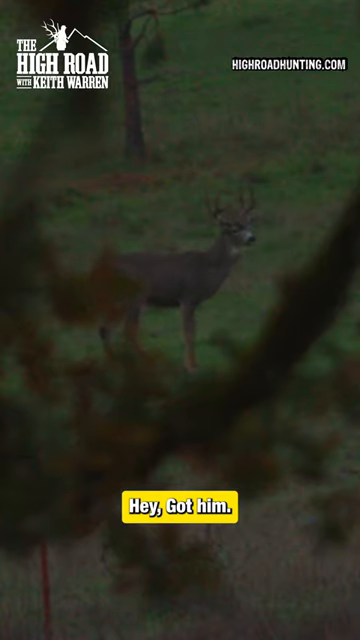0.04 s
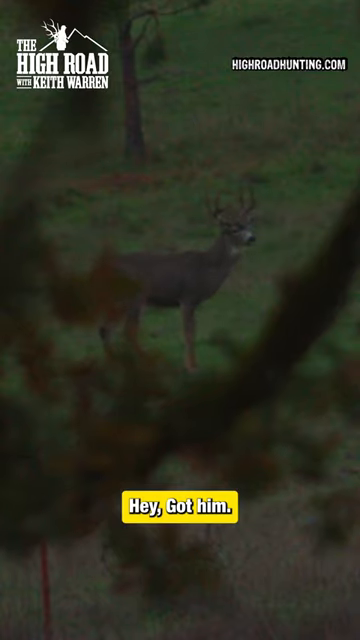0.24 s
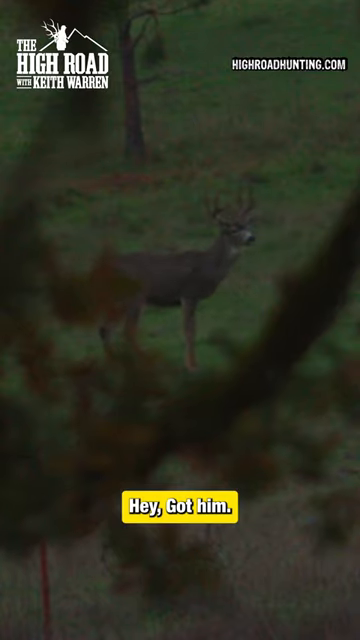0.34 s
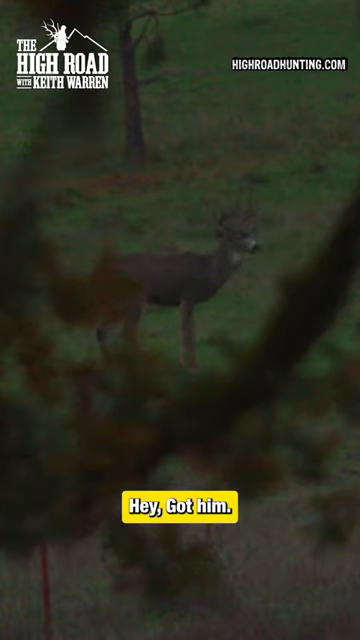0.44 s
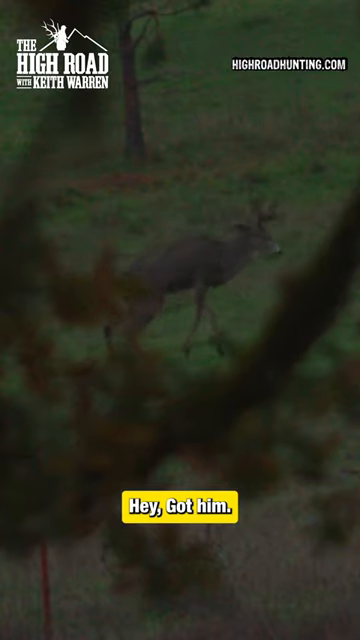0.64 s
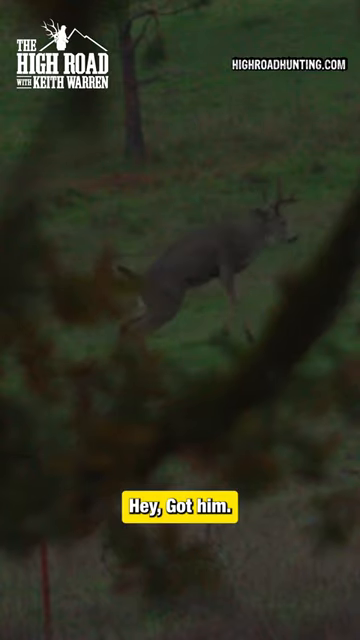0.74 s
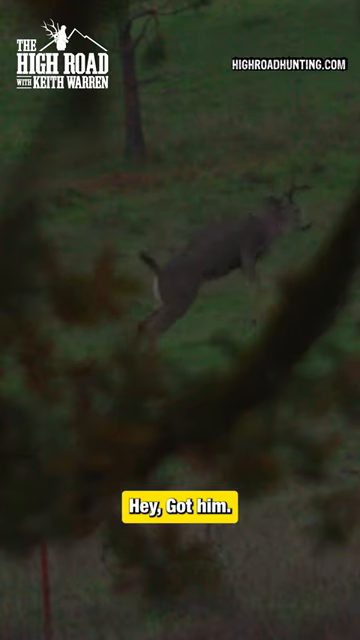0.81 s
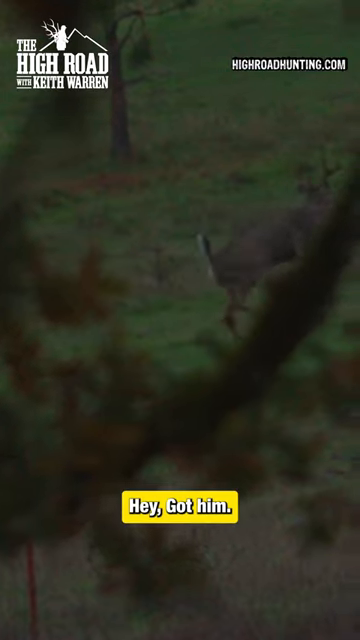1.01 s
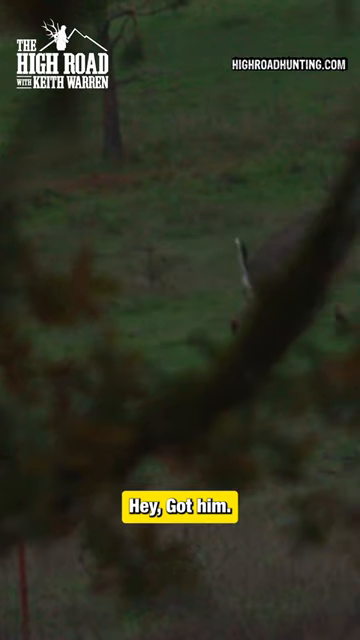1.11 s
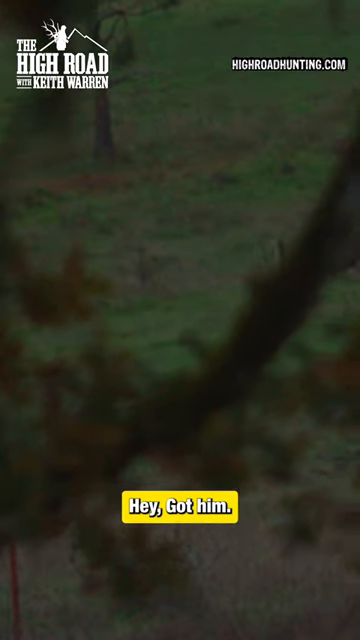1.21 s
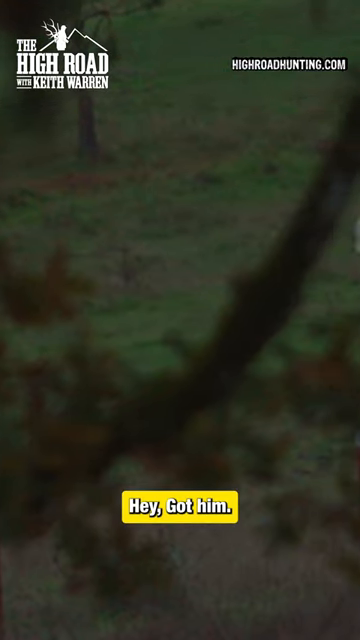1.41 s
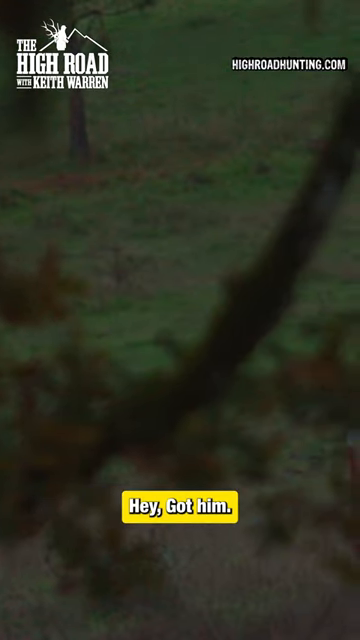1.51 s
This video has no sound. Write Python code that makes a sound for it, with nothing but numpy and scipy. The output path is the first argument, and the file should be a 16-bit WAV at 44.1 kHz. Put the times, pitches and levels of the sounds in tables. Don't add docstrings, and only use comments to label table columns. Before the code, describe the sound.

A muffled rifle fires once in open woodland, action clacking, crack echoing off the trees

```python
import sys
import numpy as np
from scipy import signal
from scipy.io import wavfile
from scipy.ndimage import uniform_filter1d, map_coordinates

SR = 44100
rng = np.random.default_rng(int(sys.argv[2]) if len(sys.argv) > 2 else 0)


def nominal_scale(level):
    x = np.asarray(level, float) / 20
    return 10 ** x


def waveform_to_disk(signal):
    frames = np.transpose(np.atleast_2d(signal))
    scaled = np.clip(frames, -1, 1) * 32767
    samples = np.round(scaled).astype(np.int16)
    wavfile.write(sys.argv[1], SR, samples)


N = 68355

# frequency [Hz], density [dB per Hz].
FIELD_SPECTRUM = [(25, -8), (60, 1), (227, -1.5), (520, 0.5), (1350, -11.5), (3310, -13), (8000, -35),
                  (16000, -45)]
# time [s], level [dB].
CLOTH_LEVEL = [(.5, -72), (.7, -51), (.85, -54.5), (.95, -59), (1.05, -56.5), (1.15, -50), (1.25, -54.5),
               (1.36, -53.5), (1.41, -49.5), (1.47, -54), (1.55, -56.5)]
# frequency [Hz], density [dB per Hz].
CLOTH_SPECTRUM = [(1500, -12), (4500, 5.5), (9000, -3), (13000, -17), (16000, -17.5)]
# highest pitch [Hz], level [dB].
SLING_TONES = [(14480, -74), (13800, -74), (11000, -75), (10250, -75), (9550, -69)]
# start [s], level [dB], frequency [Hz].
RUSTLES = [(.004, -51, 4500), (.025, -50, 4180), (.046, -57, 5500), (.054, -62, 7000), (0.061, -62, 7000),
           (0.075, -46, 3500), (.094, -62, 5000), (.124, -50, 4450), (.136, -56, 6500), (.14, -58, 5000),
           (0.154, -47, 3000), (0.169, -54, 3200), (0.178, -52, 3800), (.203, -58, 6500),
           (.21, -43.5, 4160), (.7553, -59, 10500), (.767, -60, 11000), (.9505, -37, 3000),
           (.984, -58, 7000), (1.0616, -66, 7000), (1.183, -60, 12000)]
BULLET_STRIKE = [
    (.79375, 4.5, 1750, .0035),
    (.8033, -5, 1350, .006),
]
# start [s], level [dB], frequency [Hz], T60 [s].
STRUCK_BODY = [
    (.7945, -2.5, 135, .04),
]
# start [s], level [dB], frequency [Hz], T60 [s], rise [cycles].
DULL_BLOWS = [(.483, -16, 257, 0.03, 0.4), (.496, -21.5, 252, 0.098, 0.28), (.498, -19.5, 897, 0.046, 0.32),
              (.503, -20, 119, 0.056, 0.08), (.512, -9, 630, 0.0074, 0.27), (.637, -22.5, 197, 0.022, 0.17),
              (.663, -24, 202, 0.053, 0.24), (.673, -23, 119, 0.047, 0.29), (.694, -20.5, 130, 0.018, 0.28),
              (0.389, -24, 70.5, 0.056, 0.36), (0.606, -35, 318, 0.077, 1.1),
              (.926, -28.5, 155, 0.046, 0.34), (.93, -26, 400, 0.023, 0.34), (.945, -38, 59.6, 0.15, 0.26),
              (.952, -21.5, 1090, 0.014, 1.2), (1.008, -23, 914, 0.02, 1.4),
              (1.08, -26.5, 464, 0.028, 0.59), (1.179, -16.5, 735, 0.038, 6.3),
              (.585, -22.5, 756, 0.034, 0.92), (.735, -28, 633, 0.036, 0.87), (.735, -33, 70, 0.063, .4),
              (1.235, -42, 111, 0.083, 0.42), (1.317, -37, 783, 0.061, 0.88), (.456, -15, 551, 0.055, 1.2),
              (.466, -15.5, 510, 0.057, 1), (.519, -21, 616, 0.027, .6), (.535, -23, 520, 0.045, 0.93),
              (.548, -22.5, 640, 0.03, 0.61), (1.499, -33, 87.4, 0.046, 0.48),
              (.875, -33.5, 164, 0.071, 0.92), (.885, -34.5, 703, 0.05, 1.4), (.45, -25, 91, 0.089, 0.55),
              (1.401, -34.5, 152, 0.067, .5), (1.199, -38.5, 131, 0.089, .6), (1.395, -29, 545, 0.062, 1),
              (1.16, -32, 804, 0.016, 1)]
# start [s], level [dB], frequency [Hz], T60 [s], rise [cycles].
STOCK_KNOCKS = [
    (1.4092, -11, 478, .024, 3),
    (1.4215, -29, 720, .04, 1),
    (1.4275, -29, 390, .05, .7),
    (1.4795, -22, 490, .05, 5),
]
# start [s], level [dB], frequency [Hz], T60 [s], rise [cycles].
RECOIL_BLOWS = [(.3145, -12.5, 1290, 0.017, .3), (0.32, -19, 662, 0.044, 0.71),
                (.249, -10, 273, 0.024, 0.34), (.2865, -10, 330, 0.04, 0.21), (0.31, -12, 644, 0.038, 0.24),
                (.298, -10, 1000, 0.024, 0.25), (0.27, -13.5, 91, 0.16, 0.56),
                (.3135, -9, 496, 0.047, 0.51), (.332, -8.5, 456, 0.017, 0.64)]
# struck [s], frequency [Hz], level [dB], T60 [s], faces microphone [s].
CASE_MODES = [
    (.362, 9162, -22, .4, .375),
    (.396, 9744, -22.5, .8, .485),
    (.394, 14440, -33, .3, .41),
    (.39, 15060, -26, .33, .397),
    (.37, 10300, -24, .05, .375),
]
# depth of pulsing [0-1], landing [s], half turn [s], pulsing starts [s],
# change of level on landing [dB], pulsing stops [s].
CASE_DEPTH = [.3, .98, .5, .98, 0]
CASE_LANDS = [.388, .54, .442, .57, .39]
CASE_HALF_TURN = [.05, .04, .06, .036, .05]
CASE_TUMBLES_FROM = [.37, .42, .39, .39, .37]
CASE_LANDING_DB = [-25, -24, -8, -8, 0]
CASE_STEADIES = [1, 1, 1, .51, 1]
# start [s], level [dB], body [Hz], T60 [s], crack over body [dB].
BOLT_PARTS = [(0.2642, -14, 1987, 0.068, -1), (.2665, -9.5, 1520, 0.038, -19.5),
              (.314, -12, 2016, 0.074, -6), (0.334, -15, 2024, 0.063, -15), (0.3898, -13, 726, 0.045, -19),
              (0.3946, -14.5, 946, 0.035, -20), (.4418, -4, 710, 0.014, -15),
              (0.4408, -2.5, 4200, 0.0078, -10), (0.444, -11, 4300, 0.019, -14),
              (0.4461, -4.5, 697, 0.023, -16), (.613, -17.5, 2020, 0.0074, -35),
              (.666, -67, 11500, 0.026, 16), (1.428, -47, 5030, 0.011, -7), (1.4935, -31, 5670, 0.0096, -8)]
# time [s], level [dB].
TREE_LEVEL = [(.241, -60.5), (.243, -8), (.3, -14.5), (.33, -13.5), (.36, -18), (.385, -17), (.4, -14),
              (.44, -13.5), (.5, -14.5), (.6, -20.5), (.7, -27.5), (.78, -25), (.86, -24.5), (1.0, -31),
              (1.15, -26.5), (1.3, -30.5), (1.45, -31), (1.55, -35)]
# frequency [Hz], density [dB per Hz].
CRACK_SPECTRUM = [(60, -8), (200, -9.5), (600, 0.5), (1500, -3), (3500, 2), (7000, 4), (11000, -5),
                  (15500, -9)]
# frequency [Hz], loss [dB per s].
AIR_LOSS = [(200, -3.5), (1000, -3.5), (2500, 6.5), (5000, 26.5), (8000, 54), (12000, 89), (16000, 116)]
# time [s], level [dB].
JET_LEVEL = [(.241, -65.5), (.244, -36), (.268, -18), (.29, -17), (.316, -13.5), (.35, -16.5), (.385, -19),
             (.4, -27.5), (.44, -46)]
# frequency [Hz], density [dB per Hz].
JET_SPECTRUM = [(1500, -23), (3000, -4), (4500, -2.5), (6500, 1.5), (9000, -4.5), (12000, -15),
                (16000, -23)]
# frequency [Hz], density [dB per Hz].
BLAST_SPECTRUM = [(25, -14), (50, 0), (100, 6), (170, 3), (280, -3), (560, 0), (1100, -11), (2500, -20)]
# time [s], gain [dB], recovery [s].
GAIN_DUCKS = [
    (0.448, -10, 0.029),
]

BLAST_S = .2418


def unit(x):
    return x / np.sqrt(np.mean(x ** 2) + 1e-20)


def along(points, hz):
    f, v = np.transpose(points)
    return np.interp(np.log(hz + 1), np.log(f + 1), v)


def curve(rows):
    return np.interp(np.arange(N) / SR, *np.transpose(rows))


def wobble(rate):
    knots = rng.standard_normal(int(N * rate / SR) + 4)
    return map_coordinates(knots, [np.arange(N) * rate / SR])


def rush(spectrum, patchy_db, loss=((1, 0),), since=0):
    hz, t, z = signal.stft(rng.standard_normal(N), SR, nperseg=512)
    patches = uniform_filter1d(rng.standard_normal(z.shape), size=5, axis=0)
    patches = uniform_filter1d(patches, size=3, axis=1)
    z = z * nominal_scale(along(spectrum, hz)[:, None] + patchy_db * unit(patches))
    faded = z * nominal_scale(-along(loss, hz)[:, None] * np.clip(t - since, 0, None))
    steady, faded = signal.istft([z, faded], SR, nperseg=512)[1][:, :N]
    return faded / np.std(steady)


def add(track, s, sound):
    part = track[round(s * SR):][:len(sound)]
    part += sound[:len(part)]


def burst(hz, t60, width):
    t = np.arange(SR // 8) / SR
    width = max(width, 1.2)
    edges = [hz / width, min(hz * width, SR * .49)]
    band = signal.butter(2, edges, "band", fs=SR, output="sos")
    return unit(signal.sosfilt(band, rng.standard_normal(len(t)))) * nominal_scale(-60 * t / t60)


def ring(hz, t60, cycles):
    t = np.arange(SR // 8) / SR
    return np.sin(2 * np.pi * hz * t) * nominal_scale(-60 * t / t60) * (1 - np.exp(-t * hz / cycles))


def woodland():
    return rush(FIELD_SPECTRUM, 0.37) * nominal_scale(-52 + wobble(30.0))


def far_strike():
    out = np.zeros(N)
    for s, db, hz, t60 in BULLET_STRIKE:
        slap = ring(hz, t60 / 2, .4)
        debris = .045 * burst(.7 * hz, 7 * t60, 2.2)
        add(out, s, nominal_scale(db) * (slap + debris))
    for s, db, hz, t60 in STRUCK_BODY:
        add(out, s, -nominal_scale(db) * ring(hz, t60, .7))
    return out


def tree_echo():
    t = np.arange(N) / SR - BLAST_S
    level_db = curve(TREE_LEVEL)
    crack = rush(CRACK_SPECTRUM, 1.7, AIR_LOSS, BLAST_S)
    return crack * nominal_scale(level_db + 1.93 * wobble(24.5)) * (t > -.001)


def rustles():
    out = np.zeros(N)
    for s, db, hz in RUSTLES:
        add(out, s, nominal_scale(db) * burst(hz, .013, 1.6))
    return out


def cloth():
    level_db = curve(CLOTH_LEVEL)
    return rush(CLOTH_SPECTRUM, 1.8) * nominal_scale(level_db + 0.72 * wobble(89.8))


def sling_squeak():
    top_s, half_s, sag = 1.268, .075, .105
    u = (np.arange(N) / SR - top_s) / half_s
    pitch = 1 - sag * np.minimum(u * u, 2) + 0.0022 * wobble(80)
    phase = 2 * np.pi * np.cumsum(pitch) / SR
    tones = sum(nominal_scale(db + 2.5 * wobble(60)) * np.sin(hz * phase) for hz, db in SLING_TONES)
    return tones * nominal_scale(-3 * u ** 4 - 2.5 * u) * np.clip((u + .95) / .1, 0, 1)


def stock_blows():
    out = np.zeros(N)
    for s, db, hz, t60, rise in RECOIL_BLOWS + DULL_BLOWS + STOCK_KNOCKS:
        body = 1.6 * ring(hz, t60, rise)
        rub = .2 * burst(hz, 2 * t60, 1.6)
        add(out, s, nominal_scale(db) * (body + rub))
    return out


def spent_case():
    out, now = np.zeros(N), np.arange(N) / SR
    for (s, hz, db, t60, facing_s), turn_s, from_s, land_db, deep, lands_s, calm_s in zip(
            CASE_MODES, CASE_HALF_TURN, CASE_TUMBLES_FROM, CASE_LANDING_DB, CASE_DEPTH,
            CASE_LANDS, CASE_STEADIES):
        t = (now - s).clip(0)
        tumbling = np.clip((now - from_s) / .02, 0, 1)
        calming = np.clip(1 - (now - calm_s) / .04, .2, 1)
        depth = deep * tumbling * calming
        turn = np.sqrt(1 - depth * np.sin(np.pi * (now - facing_s) / turn_s) ** 2)
        landed_db = land_db * np.clip((now - lands_s) / .01, 0, 1)
        phase = 2 * np.pi * hz * t + .6 * wobble(60)
        level = nominal_scale(db - 60 * t / t60 + landed_db + 2 * wobble(70))
        out += level * turn * np.sin(phase) * (1 - np.exp(-t / .003))
    return out


def bolt():
    out = np.zeros(N)
    for s, db, hz, t60, crack_db in BOLT_PARTS:
        body = ring(hz, t60, .3) + .4 * burst(hz, t60, 1.3)
        crack = nominal_scale(crack_db) * burst(6000, t60, 1.9)
        add(out, s, nominal_scale(db) * (body + crack))
    return out


def gas_jet():
    level_db = curve(JET_LEVEL + [(0.46, -90)])
    return rush(JET_SPECTRUM, 1.9) * nominal_scale(level_db + 1.3 * wobble(89))


def striker():
    out, click_db = np.zeros(N), -9
    click = nominal_scale(click_db) * burst(3500, .008, 1.8)
    rattle = nominal_scale(click_db - 3.5) * burst(2000, 0.022, 4.6)
    add(out, .2369, click + rattle)
    return out


def muzzle_blast():
    level_db, hold_s, t60, lumps_db = -11, .093, .04, 2
    t = np.arange(N) / SR - BLAST_S
    after = t.clip(0)
    shape_db = -60 * np.clip(t - hold_s, 0, None) / t60 - 55 * after
    gas = rush(BLAST_SPECTRUM + [(8000, -54.0)], 0.8)
    gas = gas * nominal_scale(level_db + shape_db + lumps_db * wobble(60.3)) * np.clip(t / 0.00013, 0, 1)
    pulse_hz, pulse_sag, pulse_db, pulse_t60 = 740, 36, 1, .055
    cycles = pulse_hz * (1 - np.exp(-pulse_sag * after)) / pulse_sag
    pulse = nominal_scale(pulse_db - 60 * after / pulse_t60) * np.sin(2 * np.pi * cycles)
    return gas + pulse


def scene():
    background = woodland()
    shot = muzzle_blast() + striker() + gas_jet() + tree_echo()
    blows = bolt() + stock_blows() + far_strike() + rustles()
    small = spent_case() + sling_squeak() + cloth()
    return (background + shot + blows + small)[None]


def band_limit(x):
    return signal.sosfilt(signal.butter(12, 16470, fs=SR, output="sos"), x)


def record(dry):
    now = np.arange(N) / SR
    duck_db = np.zeros(N)
    for s, db, recovery_s in GAIN_DUCKS:
        onset = np.clip((now - s) / 0.0027 + 1, 0, 1)
        duck_db += db * np.exp(-(now - s).clip(0) / recovery_s) * onset
    x = signal.sosfilt(signal.butter(2, 55, "high", fs=SR, output="sos"), dry) * nominal_scale(duck_db)
    clip, knee = .58, 4
    x = x / (1 + np.abs(x / clip) ** knee) ** (1 / knee)
    x = signal.sosfilt(signal.ellip(10, .5, 70, 15720, fs=SR, output="sos"), x)
    return band_limit(x)


dry = scene()
out = record(dry)
waveform_to_disk(out)
```